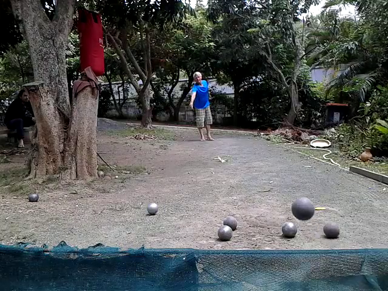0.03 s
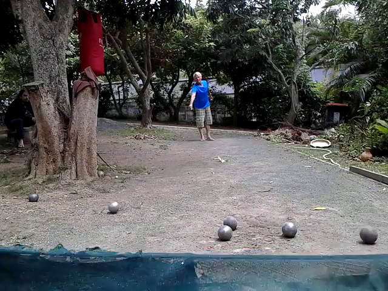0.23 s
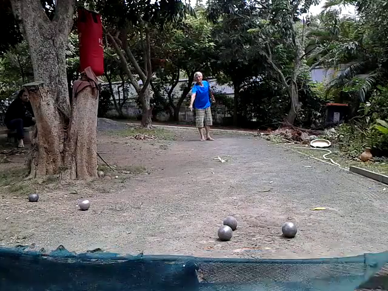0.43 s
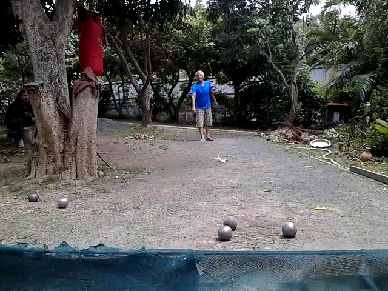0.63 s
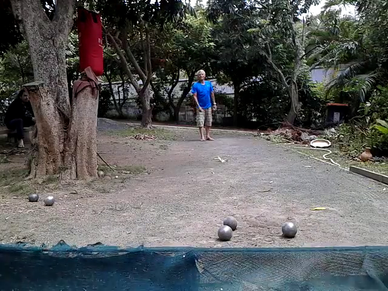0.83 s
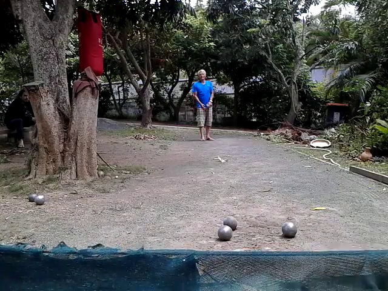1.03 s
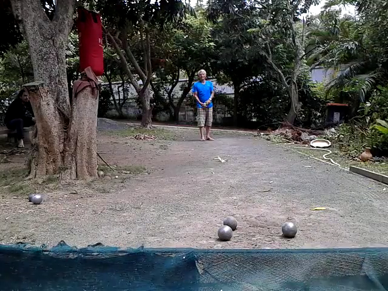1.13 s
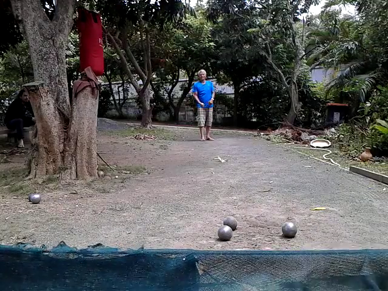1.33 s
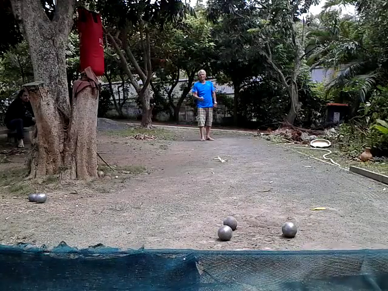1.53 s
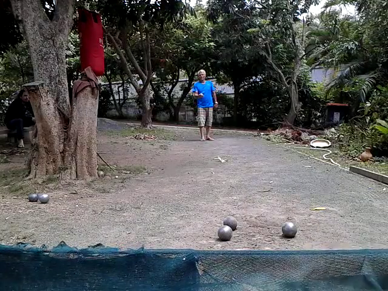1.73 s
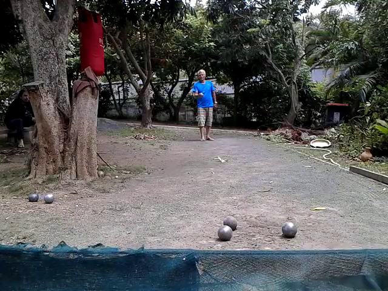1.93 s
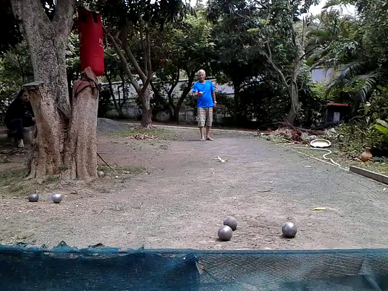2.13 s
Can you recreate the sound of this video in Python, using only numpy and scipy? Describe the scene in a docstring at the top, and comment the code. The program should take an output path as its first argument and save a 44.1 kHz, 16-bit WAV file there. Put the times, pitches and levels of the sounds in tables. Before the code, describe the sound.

A steel ball lands with a spray of gravel and, at about 0.25 seconds, clangs loudly on a metal rail, briefly overloading the microphone. It chatters there, knocks a board near 0.45 seconds, then rolls bumpily over grit and stops with a dull thud around 1.2 seconds. Two birds chirp softly throughout over faint outdoor hiss. A very faint, distant yap, perhaps a dog, comes near 1.4 seconds.

```python
"""Boule against a metal rail

A steel boule skips off a gravel court and clangs on a long rail, overloading the microphone.
It chatters there, knocks a board, rolls on over the grit and stops with a thud.
Struck bodies ring in damped modes; gravel and rattle are shaped noise.
Two birds whistle gliding notes from trees that scatter the sounds back.
There is one faint, short, far call, perhaps a dog's yap."""
import sys
import numpy as np
from scipy import signal
from scipy.fft import rfft, irfft
from scipy.io import wavfile

SR = 44100
rng = np.random.default_rng(int(sys.argv[2]) if len(sys.argv) > 2 else 0)


def put_to_file(sound):
    """Save the sound as 16-bit audio at rate SR, in the file named by the first command-line argument."""
    columns = np.atleast_2d(sound).T  # one column per channel
    safe = np.clip(columns, -1, 1)
    whole_steps = np.round(safe * 32767)
    wavfile.write(sys.argv[1], SR, whole_steps.astype(np.int16))


N = 97020

# noise spectra (frequency [Hz], relative density [dB])
AIR_SPECTRUM = [(25, -47.5), (60, 0), (130, 1), (280, 4.5), (550, -3), (1000, -2), (2000, -9), (4000, 4),
                (6000, -13.5), (8000, -31.5), (15000, -44.5)]
SPRAY_SPECTRUM = [(60, -19.5), (160, 1), (400, -6.5), (800, -8), (1500, 4.5), (2700, 3), (5000, -10.5),
                  (6500, -23.5), (8500, -53), (15000, -58)]
SNAP_SPECTRUM = [(100, -28.5), (700, -8.5), (2000, 6.5), (3800, 9.5), (6300, -0.5), (8500, -45.5),
                 (15000, -49)]
CLICK_SPECTRUM = [(500, -39.5), (5000, -0.5), (7800, -5), (9500, -34), (15000, -27)]
ROLL_SPECTRUM = [(25, -32.5), (70, -30), (130, -2.5), (200, 1), (340, -2.5), (600, -11), (2500, -20.5),
                 (9000, -52.5)]
RATTLE_SPECTRUM = [(30, -28), (100, -20), (300, -6), (700, -8), (1300, -4), (2000, -7.5), (2900, 0),
                   (4300, -5), (6500, -8), (8300, -24), (15000, -46)]
# grit snapping under the boule (time [s], level [dB], T60 [s])
SNAPS = [(.07, -51, 0.0073), (0.16, -27.5, 0.013), (.2396, -1, 0.0029), (0.4448, -24.5, 0.072),
         (.584, -41, .01), (0.633, -35.5, 0.038), (.854, -32, 0.0079), (1.2589, -38, 0.0081),
         (1.283, -34.5, 0.038)]
# impacts (time [s], level [dB])
CLICKS = [(0.4456, -22.5), (0.758, -41), (0.922, -43), (0.933, -45.5)]
THUDS = [(.158, -26.5), (1.1708, -6), (1.261, -26.5)]
CHATTER = [(.2635, -21), (.275, -2), (.280, -10.5), (.301, -15), (.3115, -6.5), (.328, -10), (.343, -25.5),
           (.361, -16.5), (.379, -22), (.396, -23.5)]
KNOCKS = [(.4455, -12), (.4545, -24), (.462, -24), (.632, -35)]
# modes of the struck bodies (frequency [Hz], level [dB], T60 [s])
THUD_MODES = [(350, -19.5, 0.058), (434, -1.5, 0.021), (604, -13.5, 0.026), (850, -6, 0.018),
              (1175, -11.5, 0.0072), (1955, -14.5, .008), (3700, -3, 0.0068), (5835, -9.5, 0.0053)]
CHATTER_MODES = [(2883, 2.5, 0.037), (3056, -7.5, 0.09), (2636, -16, 0.038), (1552, -16.5, 0.026),
                 (1242, -28, 0.046), (332, -39, 0.088)]
BOARD_MODES = [(282.4, -17, 0.27), (1357, -17.5, 0.21), (1555, -1, 0.043), (2690, -22, 0.04),
               (3040, -4.5, .018), (3790, -2, 0.019)]
# far bird's slurs, near bird's peeps (time [s], length [s], start pitch [Hz], end pitch [Hz], level [dB])
SLURS = [(0.177, 0.061, 5730, 4370, -36.5), (0.485, 0.056, 4400, 3338, -32), (.695, 0.025, 5950, 4124, -33),
         (0.731, .075, 4420, 3580, -35), (1.046, .08, 5850, 3700, -30), (1.136, 0.048, 5410, 3288, -30),
         (1.424, 0.036, 4965, 6260, -36.5), (1.452, 0.048, 6190, 4200, -40.5),
         (1.523, 0.057, 5500, 4200, -40.5), (1.732, 0.041, 4920, 5500, -36),
         (1.754, 0.095, 5000, 2960, -32), (1.869, 0.087, 4800, 3120, -32), (2.039, 0.069, 4300, 3200, -39)]
PEEPS = [(0.949, 0.046, 2756, 2662, -32), (1.169, 0.049, 2737, 2737, -29), (1.41, 0.027, 2780, 2660, -33),
         (1.426, 0.05, 2750, 2810, -31), (1.665, 0.024, 2817, 2782, -30), (1.692, 0.015, 2770, 2690, -28.5),
         (1.909, 0.067, 2870, 2727, -29.5)]
# far call (time [s], length [s], pitch [Hz], level [dB])
FAR_CALLS = [(1.425, .07, 420, -43)]
# its harmonics (pitch multiple, level [dB])
FAR_CALL_PARTIALS = [(1, -6), (2, 1.5), (3, -32)]
# bending modes of the rail (frequency [Hz], level [dB])
RAIL_MODES = [(1604, -13.5), (2347, -15.5), (2670, -3), (2862, -4), (3052, -18), (3252, -15), (3418, -10.5),
              (3618, -5), (3827, 5), (4034, -4), (4253, -18.5), (4463, -10.5), (4673, -14.5), (4904, -11),
              (5141, -8), (5380, -7.5), (5614, -1), (5877, -3.5), (6115, -15), (6375, 1.5), (6640, -2),
              (6906, -2), (7182, -3.5), (7450, -17), (7720, -16.5), (8290, -38), (8580, -29), (8880, -25),
              (9190, -25.5), (9800, -28), (10430, -29), (11060, -30.5), (11700, -36)]
# blows on the rail (time [s], level [dB], band centre [Hz], spread [octaves], undamped time [s])
CLANGS = [(.2395, -9.5, 4800, 0.95, 0.12), (.275, -15, 2950, 0.059, 0.07), (.312, -11, 5570, 0.017, .044),
          (.323, -9, 5020, 0.19, 0.018), (0.384, -25, 5620, 0.12, 0.022), (0.444, -17, 9500, 0.21, 0.019),
          (.756, -39, 8200, 0.11, 0.028)]
# rumble of the rolling boule (time [s], level [dB])
ROLL_ENVELOPE = [(.24, -44), (.3, -42), (.42, -45), (.49, -40.5), (.6, -45), (.68, -44), (.8, -43),
                 (.9, -46.5), (.98, -43.5), (1.05, -54), (1.2, -41), (1.35, -64)]
# larger bumps, lower as the boule slows (time [s], level [dB], pitch [Hz])
BUMPS = [(0.485, -34.5, 330), (0.503, -32.5, 314), (.578, -36, 285.6), (0.744, -34, 220),
         (0.835, -29.5, 176), (.896, -29, 171), (0.965, -27, 193), (.978, -30.5, 186), (.998, -28, 176),
         (1.078, -40.5, 179)]
# modes of the ground (pitch multiple, level [dB], T60 [s])
GROUND_MODES = [(0.999, 2.5, .055), (1.4, -16.5, .04), (2.3, -19, .025)]
# colour of the reflections (frequency [Hz], relative gain [dB])
TREES_RESPONSE = [(100, -1), (1500, 3), (4000, 1), (6000, -4), (8500, -19.5), (15000, -26)]
ECHO_RESPONSE = [(100, -1), (800, -1.5), (1600, 11.5), (2200, 3), (3000, -7), (4000, 7.5), (6000, -4),
                 (8000, 6.5), (15000, 5)]

AIR_DB = -52
SPRAY_DB, SPRAY_T60_S, CLICK_T60_S = -29.5, .66, .03
RAIL_REF_HZ, RAIL_T60_S, RAIL_LAG_S = 4000, .32, .0056  # T60 and phase lag at RAIL_REF_HZ
RAIL_DAMPING_EXPONENT, DAMPED_T60_S = .49, .13
ROLL_BUMPS_PER_S, ROLL_SPREAD_DB, GROUND_LOW_CUT_HZ = 400, 2, 164
RATTLE_START_S, RATTLE_DB, RATTLE_T60_S = .241, -10, .42
ECHO_DELAY_S, ECHO_DB, ECHO_T60_S = .078, -10.5, .057
TREES_T60_S, TREES_BUILD_S, LEAVES_T60_S = .6, .0027, .041
HARD_WET_DB, GROUND_WET_DB, PEEP_WET_DB, SLUR_WET_DB, SLUR_LEAVES_DB = -25.5, -20, -7, -2, -5.5
DRIVE_DB, KNEE_EXPONENT, TOP_HZ = 1, 3.8, 15650


def undb(db):
    return 10 ** (np.asarray(db) / 20)


def clock():
    return np.arange(N) / SR


def noise():
    return rng.standard_normal(N)


def drift(rate_hz):
    """Smooth random drift, spread near 1."""
    return np.interp(clock() * rate_hz, np.arange(N), noise())


def fade(start_s, t60_s):
    """Sudden start, exponential decay."""
    age_s = clock() - start_s
    return (age_s >= 0) * np.exp(-np.log(1000) * np.maximum(age_s, 0) / t60_s)


def convolve(x, response):
    return signal.fftconvolve(x, response)[:N]


def colour(x, spectrum):
    """Minimum-phase filter, unit power gain."""
    hz, db = np.array(spectrum, float).T
    bins_hz = np.arange(N // 2 + 1) * SR / N
    gain = undb(np.interp(np.log(bins_hz + 1), np.log(hz), db))
    cepstrum = irfft(np.log(gain / np.sqrt(np.mean(gain ** 2))), N)
    cepstrum[1:N // 2] *= 2
    cepstrum[N // 2 + 1:] = 0
    return convolve(x, irfft(np.exp(rfft(cepstrum)), N)[:N // 20])


def scatter(x, t60_s, build_s):
    """Dense reflections: a noise tail of unit energy."""
    tail = noise() * fade(0, t60_s) * (1 - np.exp(-clock() / build_s))
    return convolve(x, tail / np.sqrt(np.sum(tail ** 2)))


def strike(blows, modes, cutoff_hz):
    """Blows ring damped modes; softer contact, lower cutoff."""
    force = np.zeros(N)
    for start_s, db in blows:
        force[int(start_s * SR)] += undb(db)
    force = signal.sosfilt(signal.butter(8, cutoff_hz, fs=SR, output="sos"), force + 1e-18)
    ring = sum(undb(db) * np.sin(2 * np.pi * hz * clock()) * fade(0, t60_s) for hz, db, t60_s in modes)
    return convolve(force, ring)


def air():
    """Faint, slowly wavering hiss of still air."""
    return undb(AIR_DB + .89 * drift(2.3)) * colour(noise(), AIR_SPECTRUM)


def gravel():
    """Spray from the landing dies away; single stones snap and click."""
    spray = noise() * undb(SPRAY_DB + 1.8 * drift(400)) * fade(0, SPRAY_T60_S)
    snaps = noise() * sum(undb(db) * fade(start_s, t60_s) for start_s, db, t60_s in SNAPS)
    clicks = noise() * sum(undb(db) * fade(start_s, CLICK_T60_S) for start_s, db in CLICKS)
    return colour(spray, SPRAY_SPECTRUM) + colour(snaps, SNAP_SPECTRUM) + colour(clicks, CLICK_SPECTRUM)


def trees(hard, ground):
    """Trunks and leaves scatter the boule's sounds back."""
    incident = undb(HARD_WET_DB) * hard + undb(GROUND_WET_DB) * ground
    return colour(scatter(incident, TREES_T60_S, TREES_BUILD_S), TREES_RESPONSE)


def thuds():
    """Dull, quickly damped impacts of the boule."""
    return strike(THUDS, THUD_MODES, cutoff_hz=5800)


def tone(start_s, length_s, first_hz, last_hz, db, warble):
    """One gliding note; warble is its fractional pitch jitter."""
    progress = np.clip((clock() - start_s) / length_s, 0, 1)
    hz = first_hz * (last_hz / first_hz) ** progress * (1 + warble * drift(700))
    envelope = undb(db) * np.sqrt(np.abs(np.sin(np.pi * progress)))
    return envelope * np.sin(2 * np.pi * np.cumsum(hz) / SR)


def birds():
    """Two whistlers: near, almost level peeps; far, mostly falling slurs."""
    peeps = sum(tone(*note, warble=.0142) for note in PEEPS)
    slurs = sum(tone(*note, warble=.09) for note in SLURS)
    return peeps, slurs


def foliage(peeps, slurs, call):
    """Leaves blur the slurs and the far call; trees scatter the birdsong back."""
    blurred = scatter(undb(SLUR_LEAVES_DB) * slurs + call, LEAVES_T60_S, build_s=.002)
    incident = undb(PEEP_WET_DB) * peeps + undb(SLUR_WET_DB) * slurs
    return blurred + scatter(incident, TREES_T60_S, TREES_BUILD_S)


def rail():
    """Bending modes ring until the boule damps them; higher modes die sooner."""
    out = np.zeros(N)
    age_s = clock()[:N // 3]
    hz, db = np.array(RAIL_MODES, float).T[:, :, None]
    ratio = hz / RAIL_REF_HZ
    lag_s = RAIL_LAG_S / np.sqrt(ratio)  # treble travels faster
    decay = np.exp(-np.log(1000) * age_s * ratio ** RAIL_DAMPING_EXPONENT / RAIL_T60_S)
    rings = undb(db) * np.sin(2 * np.pi * hz * (age_s - lag_s)) * decay
    for start_s, level_db, centre_hz, spread_oct, free_s in CLANGS:
        weight = np.exp(-.5 * (np.log2(hz / centre_hz) / spread_oct) ** 2)
        damping = np.exp(-np.log(1000) * np.maximum(age_s - free_s, 0) / DAMPED_T60_S)
        at = int(start_s * SR)
        out[at:at + len(age_s)] += undb(level_db) * (weight * rings).sum(axis=0) * damping
    return out


def rolling():
    """Small bumps of uneven ground rumble under the heavy boule."""
    jolts = (rng.random(N) < ROLL_BUMPS_PER_S / SR) * noise() * undb(ROLL_SPREAD_DB * drift(30))
    rumble = scatter(jolts / jolts.std(), t60_s=.02, build_s=.0016)
    times_s, db = np.array(ROLL_ENVELOPE).T
    envelope = undb(np.interp(clock(), times_s, db, left=-90, right=-90))
    return colour(rumble * envelope, ROLL_SPECTRUM)


def rattle():
    """The rail rattles on the ground after the first blow."""
    burst = noise() * fade(RATTLE_START_S, RATTLE_T60_S) * undb(.83 * drift(302.3))
    return undb(RATTLE_DB) * colour(burst, RATTLE_SPECTRUM)


def chatter():
    """The boule rebounds rapidly against the rail."""
    return strike(CHATTER, CHATTER_MODES, cutoff_hz=6000)


def echo(x):
    """One delayed, smeared reflection."""
    reflected = colour(scatter(x, ECHO_T60_S, build_s=.003), ECHO_RESPONSE)
    return undb(ECHO_DB) * np.interp(clock() - ECHO_DELAY_S, clock(), reflected, left=0)


def board():
    """The boule's knocks ring the board."""
    return strike(KNOCKS, BOARD_MODES, cutoff_hz=6000)


def bumps():
    """The ground booms briefly under each larger bump."""
    out = np.zeros(N)
    for start_s, db, hz in BUMPS:
        modes = [(k * hz, mode_db, t60_s) for k, mode_db, t60_s in GROUND_MODES]
        out += strike([(start_s, db)], modes, cutoff_hz=1200)
    return out


def far_call():
    """One faint, short call of three rough harmonics, perhaps a dog's yap."""
    return sum(tone(start_s, length_s, k * hz, k * hz, db + partial_db, warble=.08)
               for start_s, length_s, hz, db in FAR_CALLS for k, partial_db in FAR_CALL_PARTIALS)


def scene():
    """The boule's run, its reflections, air, birds and the far call; mono."""
    crash = rattle() + chatter()
    hard = gravel() + rail() + crash + board()
    low_cut = signal.butter(3, GROUND_LOW_CUT_HZ, "high", fs=SR, output="sos")
    ground = signal.sosfilt(low_cut, thuds() + rolling() + bumps())
    court = hard + ground + echo(crash) + trees(hard, ground) + air()
    peeps, slurs = birds()
    return (court + peeps + foliage(peeps, slurs, far_call()))[None]


def record(dry):
    """The microphone flattens the loudest peaks and cuts the top."""
    driven = dry * undb(DRIVE_DB)
    clipped = driven / (1 + np.abs(driven) ** KNEE_EXPONENT) ** (1 / KNEE_EXPONENT)
    return signal.sosfilt(signal.ellip(8, .2, 70, TOP_HZ, fs=SR, output="sos"), clipped)


dry = scene()
out = record(dry)
put_to_file(out)
```